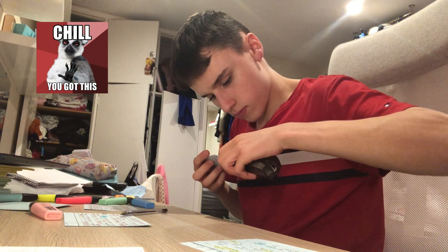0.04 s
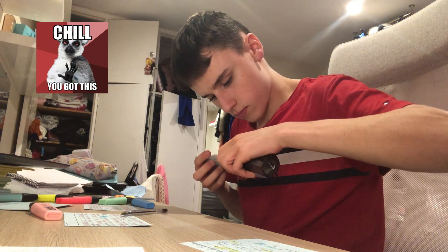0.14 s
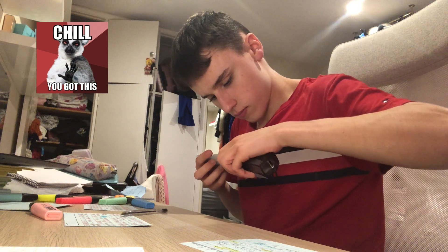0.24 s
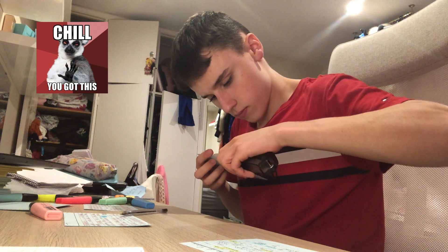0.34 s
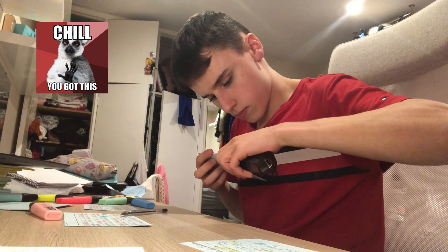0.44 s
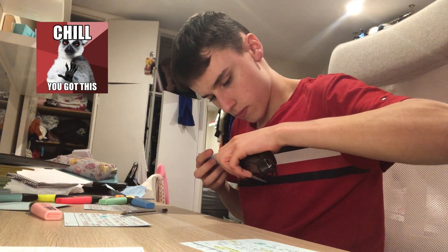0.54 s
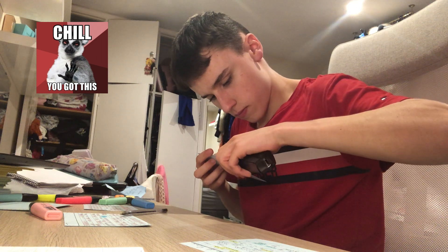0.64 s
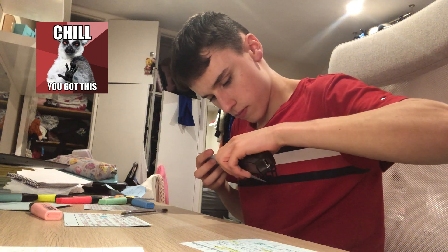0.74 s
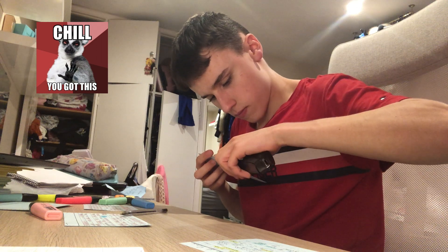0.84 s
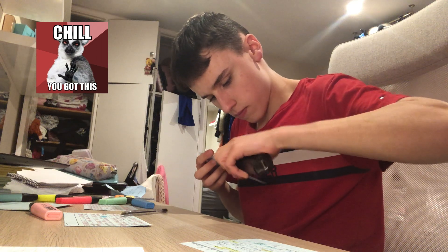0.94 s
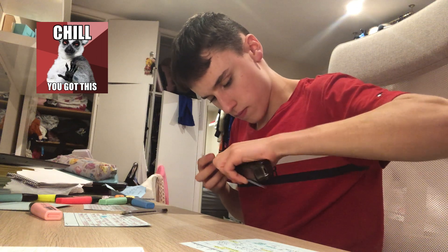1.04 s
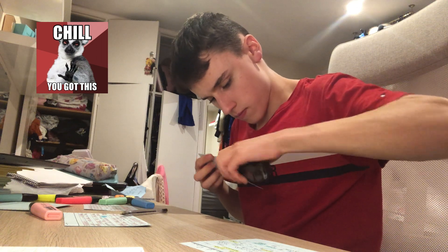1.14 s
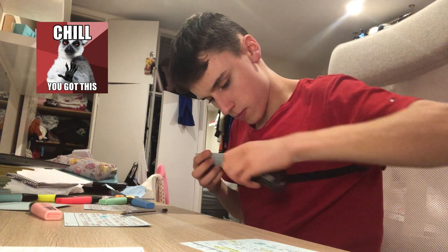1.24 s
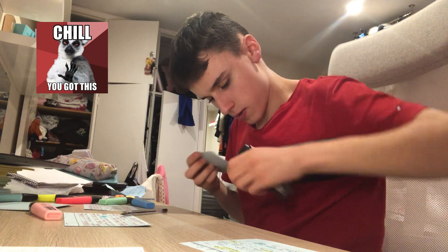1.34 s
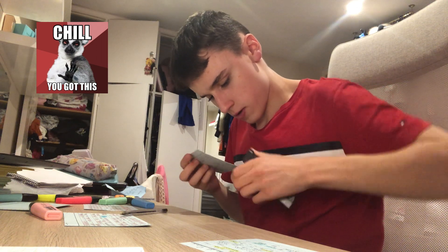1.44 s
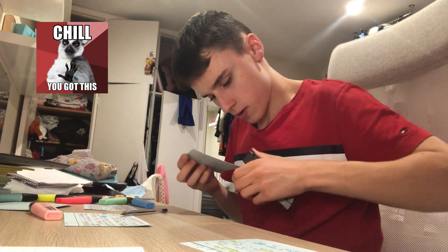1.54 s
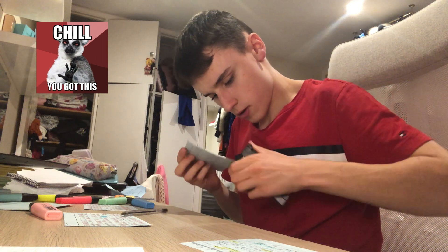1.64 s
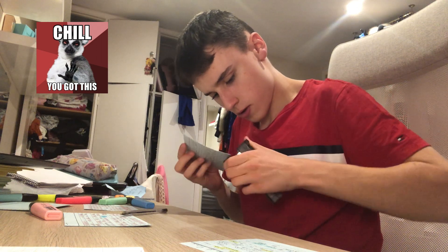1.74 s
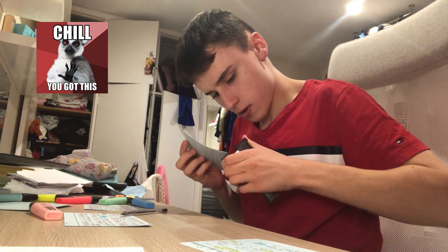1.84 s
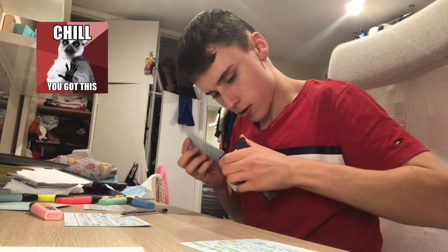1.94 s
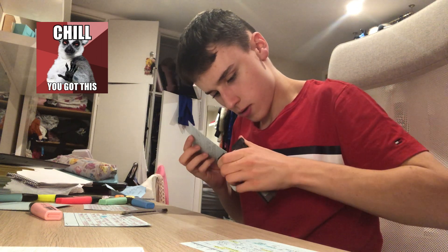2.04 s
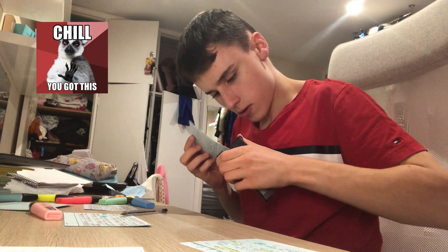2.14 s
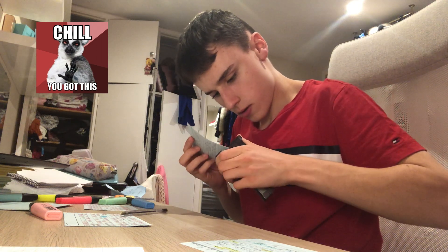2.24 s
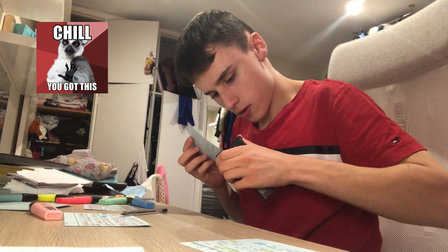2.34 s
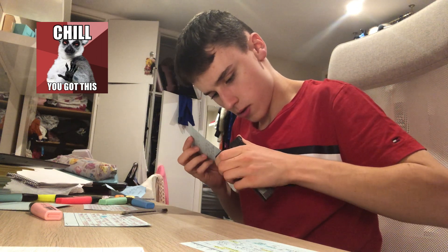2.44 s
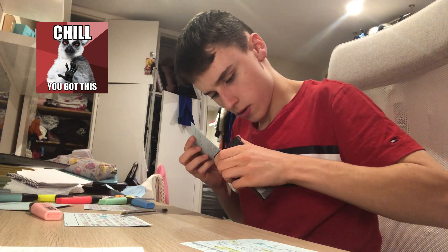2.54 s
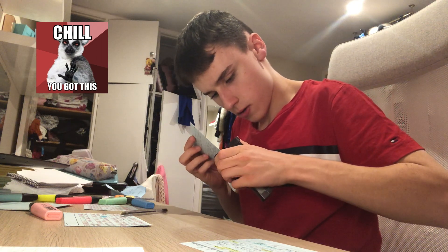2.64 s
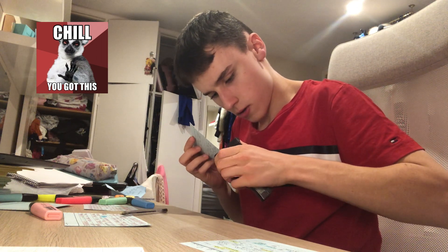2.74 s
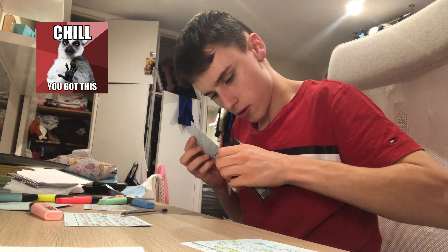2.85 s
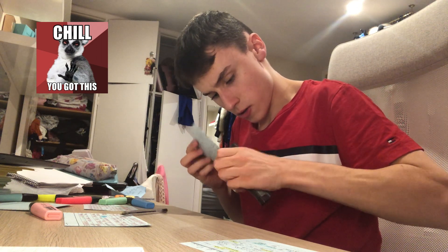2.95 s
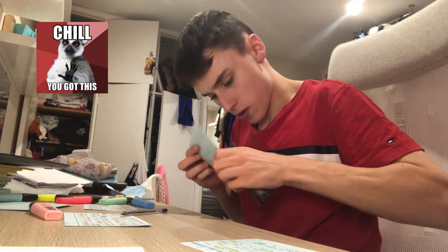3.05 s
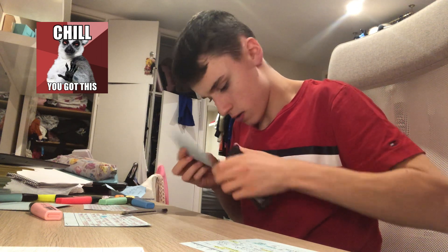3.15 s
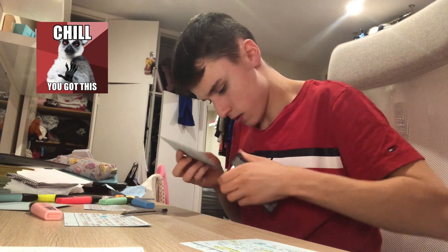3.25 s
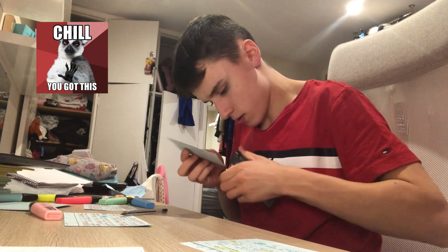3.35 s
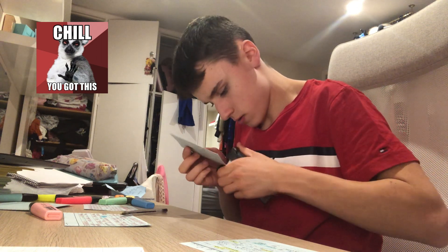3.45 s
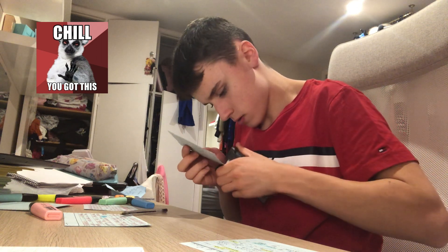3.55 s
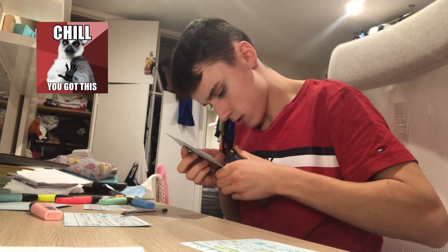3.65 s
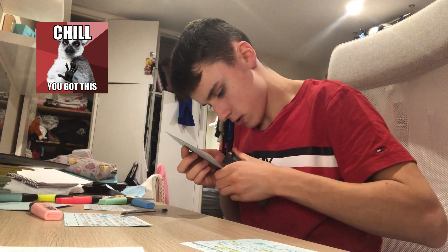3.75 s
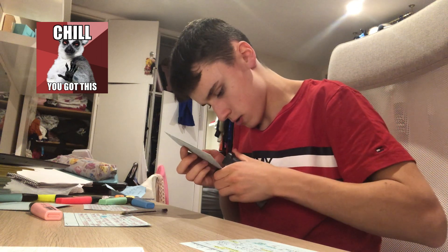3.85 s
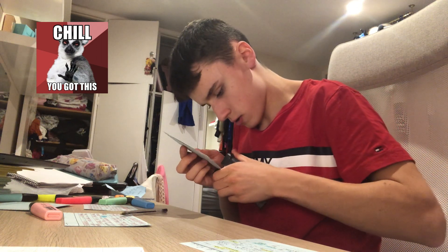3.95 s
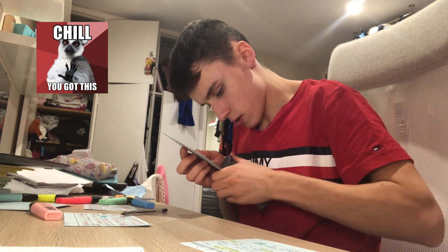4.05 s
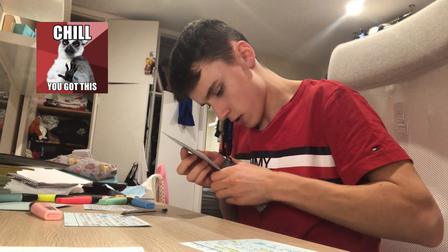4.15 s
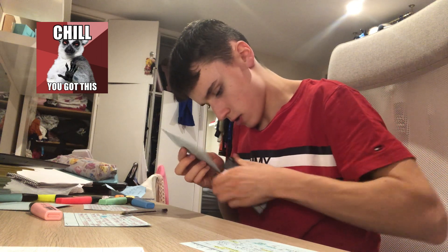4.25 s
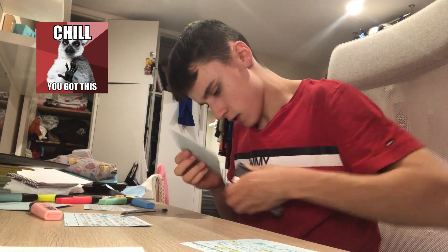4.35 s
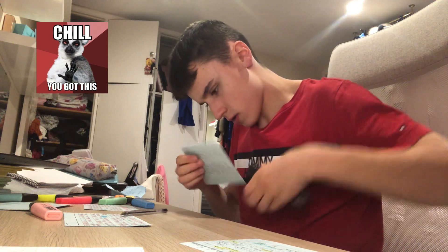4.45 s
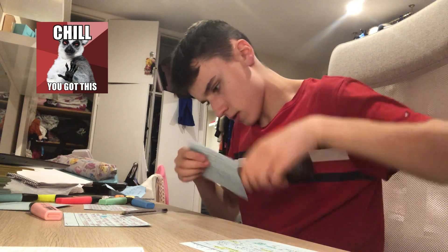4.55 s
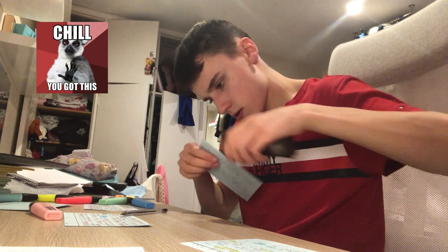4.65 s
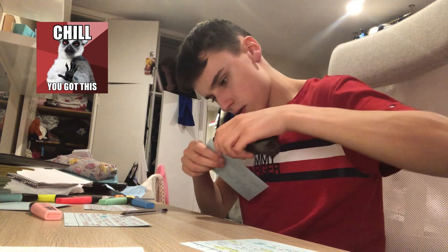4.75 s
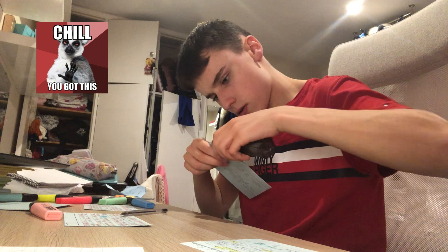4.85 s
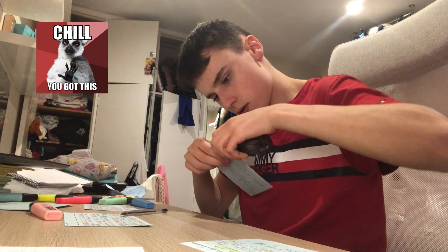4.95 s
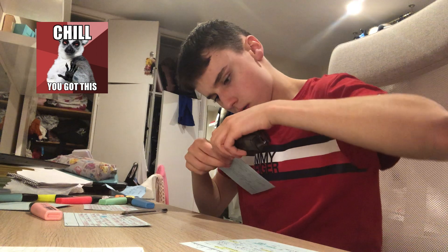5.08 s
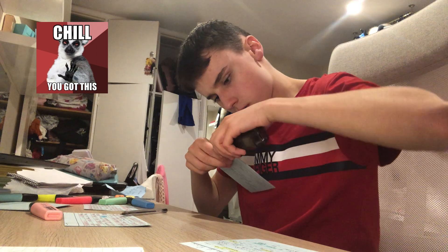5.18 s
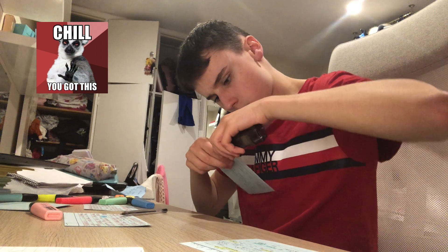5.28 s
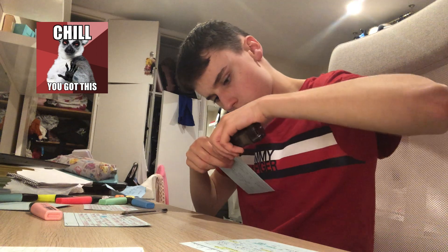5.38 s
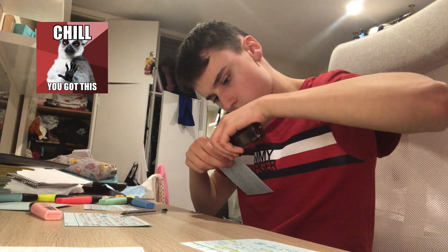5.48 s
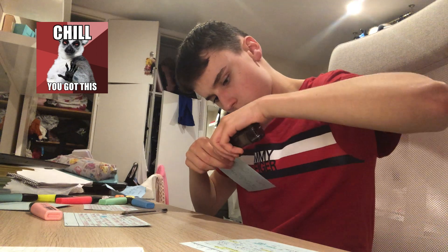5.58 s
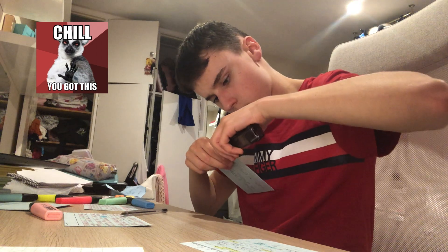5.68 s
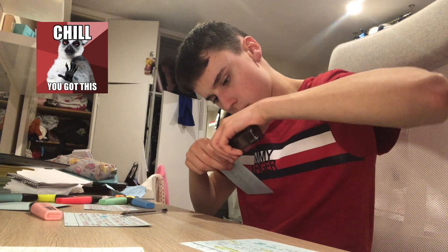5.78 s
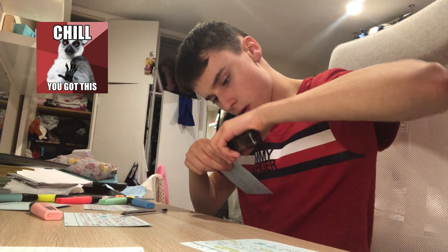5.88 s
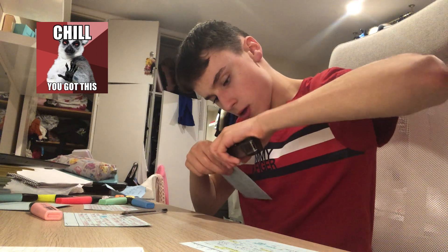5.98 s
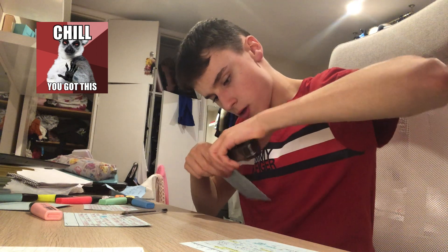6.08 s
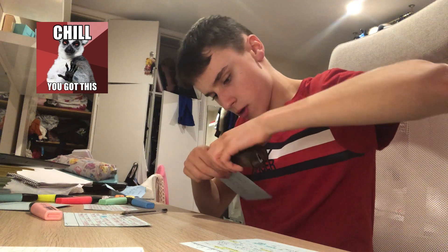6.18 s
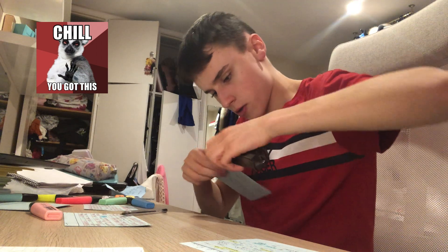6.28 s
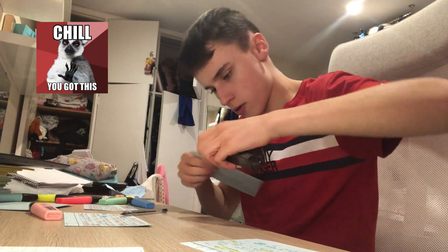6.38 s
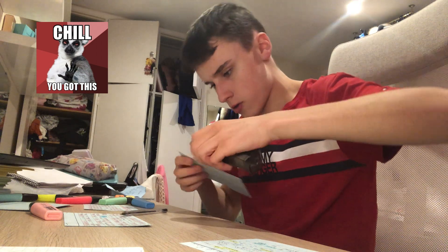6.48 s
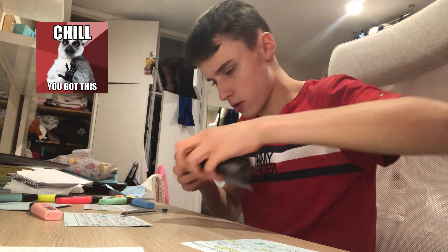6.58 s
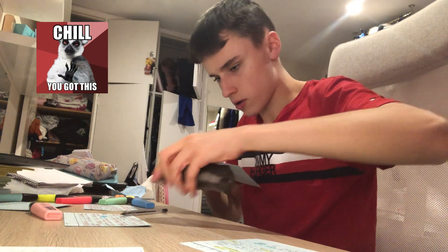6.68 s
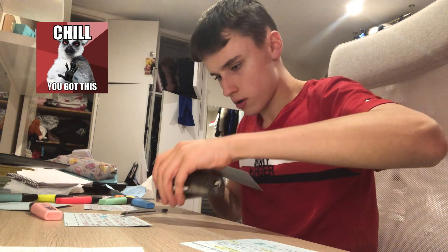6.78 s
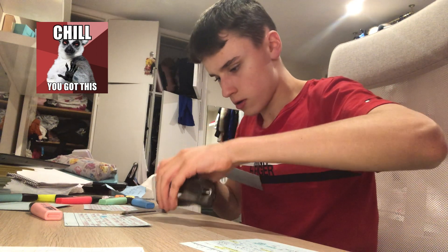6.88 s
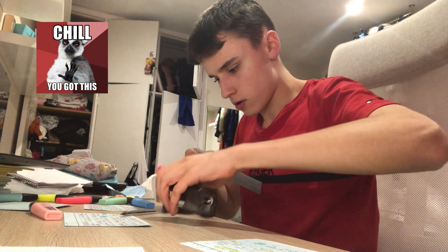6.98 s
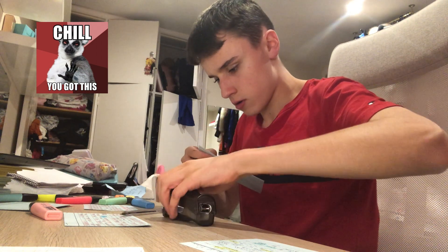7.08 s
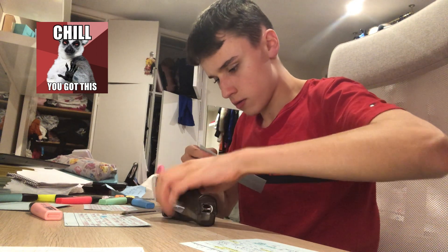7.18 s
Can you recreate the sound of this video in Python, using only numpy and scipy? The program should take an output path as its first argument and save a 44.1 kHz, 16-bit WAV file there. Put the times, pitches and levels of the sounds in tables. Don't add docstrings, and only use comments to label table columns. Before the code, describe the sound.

A quiet small room with soft hiss and faint low rumble, heard by a microphone close above a wooden desk. Small metallic handling taps come at 0.3 to 0.5 seconds. At about 0.9 a stapler takes up with a light click, then crunches in a bright, hard double clack near 1.0 and snaps open at 1.2, with papery scuffs around it. Soft finger rubs and tiny ticks fill the pause. A second squeeze clacks at 2.9 and releases at 3.1 amid card rustle; a third, a little softer, at 4.05 releases at 4.25, with an extra weaker snap at 4.5. Quieter rubbing follows until a fourth clack at 5.9, opening at 6.1 with a faint singing spring. Card brushes gently from 6.0 to 6.9. At 7.08 to 7.1 the stapler slams onto the desk in a rapid cluster of loud, woody, clipped knocks, with a short resonant decay.

```python
import sys
import numpy as np
from scipy import signal
from scipy.fft import rfft, irfft
from scipy.io import wavfile
from scipy.ndimage import uniform_filter1d

SR = 44100
rng = np.random.default_rng(int(sys.argv[2]) if len(sys.argv) > 2 else 0)


def materialize(psi):
    bounded = np.clip(np.atleast_2d(psi).T, -1, 1)
    quanta = np.round(bounded * 32767).astype(np.int16)
    wavfile.write(sys.argv[1], SR, quanta)


def magnitude_from_level(level_db):
    exponent = np.asarray(level_db, float) / 20
    return 10 ** exponent


N = 318402

# (frequency [Hz], density [dB])
HISS_SPECTRUM = [(41, -35), (70, -1.5), (171, 1.5), (688, -6.5), (1400, -14.5), (7760, -22), (9320, -26.5),
                 (15500, -25)]
HISS_DB = -61.5
# (start [s], length [s], level [dB])
RUMBLES = [(.1, 0.31, -57.5), (0.616, 0.19, -59.5), (1.85, 0.32, -65), (2.349, .3, -67), (3.1, 0.23, -69),
           (3.701, .4, -63.5), (4.45, .4, -68), (5.8, .55, -67), (6.502, .4, -68.5)]
DRONES = [(1.0, 0.22, -60.5), (2.4, .85, -64), (3.9, .55, -61), (5.05, .45, -63.5), (5.95, .2, -65),
          (6.55, .65, -62)]
RUMBLE_REST_DB, DRONE_REST_DB, SWELL_S = -72, -78, 0.06

# (start [s], length [s], rub [dB],
# edge squeak [dB])
STROKES = [(0, 0.44, -74, -88), (1.017, 0.12, -52.5, -53), (1.138, 0.097, -51, -49.5),
           (1.241, 0.12, -64, -70), (1.62, .1, -73, -80), (1.857, 0.096, -68, -76), (2.299, .35, -73, -80),
           (2.944, .1, -52.5, -67), (3.063, 0.069, -47, -57), (3.173, 0.19, -67, -65),
           (3.386, 0.12, -61, -64.5), (3.602, .12, -68, -74), (3.86, 0.15, -71.5, -69),
           (4.092, 0.23, -55.5, -61), (4.35, 0.23, -62, -67), (4.558, .12, -62.5, -66),
           (4.74, .14, -77, -71), (4.998, .3, -69, -75), (5.429, 0.064, -69, -80), (5.97, 0.28, -61, -62),
           (6.35, 0.19, -64.5, -65), (6.542, 0.12, -60.5, -65), (6.698, 0.17, -63, -70.5),
           (6.968, 0.061, -64, -70.5)]
GRIP_RUB_DB, GRIP_SQUEAK_DB, STROKE_ATTACK_S, STROKE_RELEASE_S = -78, -81, 0.017, 0.04
# (frequency [Hz], density [dB])
CARD_SPECTRUM = [(400, -16), (800, -4), (1500, -1), (2500, -6), (4700, -2), (7000, -10), (11000, -16),
                 (15500, -18.5)]

# (frequency [Hz], level [dB], t60 [s])
SHELL = [(570, -9, 0.022), (740, 8, 0.022), (863, 3.5, 0.035)]
LEVER = [(1056, 0.85, 0.01), (1290, 1.1, .014), (1530, 3, 0.028)]
ARM = [(1960, -10, 0.01), (2213, 4.5, 0.027), (2540, -2.5, 0.011)]
CRACK = [(6600, -3.5, 0.0013), (7670, -1.2, 0.0043), (7930, 1.1, 0.021), (8970, -1.6, 0.0053),
         (10820, 1, 0.0035), (11600, -2, 0.0014), (15500, -5.3, 0.00067)]
MAGAZINE = [(2890, 5.5, 0.0073), (3274, 5.5, 0.017), (3610, 7, 0.015), (4030, -0.5, .008), (4580, -3, .008),
            (4830, -8, 0.0063)]
# (low edge [Hz], high edge [Hz], build-up [ms], broad grit [dB])
PART_RESPONSES = [
    (446, 1000, 3, -8),
    (970, 1790, 2.3, -5.5),
    (1700, 2100, 2.4, -12.5),
    (5100, 13700, 1.2, 2.5),
    (2400, 5600, 1.9, -4),
]

# (time [s], peak [dB], shell [dB], lever [dB], arm [dB])
TAKE_UP = [(.9134, -26, -10, -4, -8), (2.8455, -30, -25.5, -3, -12), (4.009, -25.5, -14, -17, -4),
           (5.7096, -41.5, -24, -16, 1)]
DRIVE = [(.9727, -7, -20, 4, -1), (2.8994, -8, -12, 0, -15), (4.0514, -16, -6, 4, 0),
         (5.903, -9, -11.5, 3, 0.5)]
CLINCH = [(1.0066, -7, -7.5, -1.5, -18), (2.9416, -7.5, -12, -6.5, -11.5), (4.096, -13, -8, -10, -13.5),
          (5.9565, -9, -6.5, -3, -4)]
LET_GO = [(1.157, -27, -18, -11, -9.5), (3.0758, -22.5, -22, -9, -14), (4.2276, -26, -28, -5.5, -15),
          (6.1014, -26, -16.5, -3.5, -8)]
SNAP_OPEN = [(1.1827, -7, -21.5, -25, -8.5), (3.101, -12.5, -15.5, -11.5, -14),
             (4.2554, -11, -14.5, -11, -7.5), (6.123, -13, -10, -11, 1), (4.5034, -22.5, -3.5, -9.5, -13)]
STAGE_CRACK_DB = [
    -8.5,
    -8.5,
    -6.5,
    -5,
    -3,
]
FACING_DB = [-2, -3, 2.5, 6, -9]

# (time [s], peak [dB], struck part above the magazine [dB])
SHELL_TAPS = [(.32, -39.5, -5.5), (.5126, -36.5, -0.5), (1.1313, -31.5, 5), (1.2348, -35, -2),
              (1.457, -50.5, 1.5), (2.0038, -48.5, 13), (2.142, -53.5, 13.5), (2.3334, -50, 0),
              (2.3741, -48.5, 8), (2.382, -33, 6.5), (3.1436, -36, -2), (3.4068, -56.5, 12.5),
              (3.4492, -49, 5), (3.4694, -53, 7.5), (4.0271, -33, 4.5), (4.2802, -29, 5), (4.3026, -33, 7),
              (4.518, -44, 10), (4.4189, -49.5, 6), (6.2292, -36.5, 2.5), (7.0914, -23, 18),
              (7.1027, -23, -1)]
LEVER_CLICKS = [(1.2219, -32.5, 3.5), (1.6247, -54.5, 1.5), (2.348, -53.5, 7.5), (2.855, -36, 3),
                (3.5319, -52.5, 8.5), (3.8432, -41.5, 3.5), (4.2043, -29.5, -3.5), (5.745, -49.5, 14),
                (6.0925, -39, -2), (6.2441, -41.5, 8)]
ARM_TICKS = [(0.3772, -47.5, -14), (0.9032, -42.5, -22), (3.1339, -28.5, -12), (4.0053, -43.5, 3.5),
             (5.319, -58.5, 8.5), (5.7292, -47, -7), (6.2127, -35, -9), (6.7999, -49.5, 5.5)]
STAPLE_TICKS = [(0.292, -45.5, -3), (1.3262, -32, -10.5), (1.3996, -58.5, 7), (2.815, -52, -1),
                (3.7662, -48, -2.5), (5.672, -55.5, 2.5)]
# (shell [dB], lever [dB], arm [dB], crack [dB])
SPREAD_DB = [
    (0.5, -5, -11, -14),
    (-8, 0.5, -10, -14.5),
    (-10, -8, 0, -13),
    (-13.5, -12.5, -10, 0.5),
]
FOLLOWS = 0.66

# (frequency [Hz], level [dB], t60 [s])
JOLT_MODES = [(124.8, -23, 0.1), (195, -29, .12), (240, -35, 0.04), (279.2, -10.5, 0.15), (420, -8.5, .08)]
# (start [s], damped at [s], frequency [Hz], level [dB], t60 [s])
SPRING = [(1.01, 1.13, 3990, -50, 0.33), (2.943, 3.084, 2110, -50, 1), (3.105, 3.235, 1780, -44.5, 0.32),
          (3.138, 3.24, 2080, -55.5, .4), (4.262, 4.493, 1720, -56, 0.9), (4.503, 4.68, 1855, -52, 0.35),
          (5.957, 6.107, 2120, -45, 0.98), (5.958, 6.06, 1432, -57.5, 0.12), (6.118, 6.21, 4960, -54, 0.4),
          (4.26, 4.49, 3280, -57, .7), (3.19, 3.5, 3530, -66, 3.0)]
# (time [s], blow [dB], contact time [ms], sweep [dB])
SET_DOWN = [
    (7.053, -48, 0.39, -28),
    (7.066, -36, 0.55, -35),
    (7.0766, -9, 0.36, 12),
    (7.0917, 5.5, 1.1, 7.5),
    (7.0984, -1, 1.2, 1),
    (7.104, -17, 1.43, 0),
]
# (frequency [Hz], level [dB], t60 [s])
DESK_MODES = [(127, -19, 0.214), (199.5, -23, 0.2), (279.2, 2, 0.19), (334.8, -16, 0.28), (411, -6, 0.16),
              (480, -8, 0.24), (527, 0, 0.06), (668, -8.5, 0.11), (800, -10.5, 0.15), (1117, -21.5, 0.15),
              (1470, -22, 0.12), (1630, -34, 0.12), (1860, -34, 0.18), (2020, -25, 0.18)]

# (frequency [Hz], t60 [s], level [dB])
ROOM = [(150, .3, -8.5), (465, 0.14, -4), (1450, .2, -17.5), (4000, 0.16, -12), (10000, 0.08, -11.5)]
# (delay [ms], level [dB])
ECHOES = [
    (3.0, -13.5),
    (9.5, -17.5),
    (21.0, -25),
]


def rms_one(x):
    return x / np.sqrt(np.mean(x ** 2) + 1e-20)


def loudest_one(x):
    return x / np.sqrt(uniform_filter1d(x ** 2, size=256).max())


def band(x, low_hz, high_hz):
    return signal.sosfilt(signal.butter(2, [low_hz, high_hz], "band", fs=SR, output="sos"), x)


def at_hz(points, hz, axis=1):
    points = np.array(points)
    return np.interp(np.log(hz), np.log(points[:, 0]), points[:, axis])


def coloured(x, spectrum):
    hz = np.arange(len(x) // 2 + 1) * SR / len(x) + 1
    return rms_one(irfft(rfft(x) * magnitude_from_level(at_hz(spectrum, hz)), len(x)))


def drift(rate_hz):
    r = np.exp(-2 * np.pi * rate_hz * 40 / SR)
    white = rng.standard_normal(N // 40 + 2002)
    slow = signal.lfilter([1], [1, -2 * r, r * r], white)[2000:]
    return np.interp(np.arange(N) / 40, np.arange(len(slow)), rms_one(slow))


def ring(clicks, hz, t60):
    r, w = magnitude_from_level(-60 / (t60 * SR)), 2 * np.pi * hz / SR
    return signal.lfilter([0, np.sin(w)], [1, -2 * r * np.cos(w), r * r], clicks + 1e-18)


def add(out, s, sound):
    at = round(s * SR)
    out[at:at + len(sound)] += sound[:N - at]


def swells(starts, lengths, levels_db, rest_db, attack_s, release_s):
    t = np.arange(0, N / SR + 0.01, 0.002)
    power = magnitude_from_level(2 * rest_db)
    for s, length, level_db in zip(starts, lengths, levels_db):
        rise = np.clip((t - s) / attack_s, 0, 1) ** 2
        fall = np.exp(-2 * np.maximum(t - s - length, 0) / release_s)
        power = power + magnitude_from_level(2 * level_db) * rise * fall
    return np.interp(np.arange(N) / SR, t, np.sqrt(power))


def floor():
    rumbling = swells(*np.transpose(RUMBLES), RUMBLE_REST_DB, SWELL_S, SWELL_S)
    droning = swells(*np.transpose(DRONES), DRONE_REST_DB, SWELL_S, SWELL_S)
    hiss, rumble, drone = rng.standard_normal((3, N))
    return (magnitude_from_level(HISS_DB - 0.5) * coloured(hiss, HISS_SPECTRUM)
            + rumbling * magnitude_from_level(3) * rms_one(band(band(rumble, 32, 52), 32, 62))
            + droning * rms_one(ring(drone, 510, t60=0.046)))


def card(grain_db=2.2, grains_per_s=4000, squeak_hz=3520, upper_hz=4100):
    s, length, rub_db, squeak_db = np.transpose(STROKES)
    rub = swells(s, length, rub_db, GRIP_RUB_DB, STROKE_ATTACK_S, STROKE_RELEASE_S)
    edge = swells(s, length, squeak_db, GRIP_SQUEAK_DB, STROKE_ATTACK_S, STROKE_RELEASE_S)
    heights = magnitude_from_level(grain_db * np.minimum(rng.exponential(1, N), 4.0))
    grains = (rng.random(N) < grains_per_s / SR) * heights * rng.choice([-1, 1], N)
    squeak = rms_one(ring(grains, squeak_hz, t60=0.015) + magnitude_from_level(-5) * ring(grains, upper_hz, t60=0.0074))
    rubbing = rub * magnitude_from_level(2.3 * drift(41)) * coloured(grains, CARD_SPECTRUM)
    return rubbing + edge * magnitude_from_level(3.0 * drift(15) - 4.5) * squeak


def contacts():
    rows = []
    stages = (TAKE_UP, DRIVE, CLINCH, LET_GO, SNAP_OPEN)
    for table, crack_db in zip(stages, STAGE_CRACK_DB):
        for row, facing_db in zip(table, FACING_DB):
            rows.append((*row, crack_db + facing_db))
    for struck, table in enumerate((SHELL_TAPS, LEVER_CLICKS, ARM_TICKS, STAPLE_TICKS)):
        share = np.where(np.arange(len(SPREAD_DB)) == struck, 1, FOLLOWS)
        for s, peak_db, above_db in table:
            rows.append((s, peak_db, *(SPREAD_DB[struck] + share * above_db)))
    return rows


def stapler(rattle_ms=24.0, rattle_db=-18, radiates_hz=450, soften=0.55, slam=5.5):
    front, around = np.zeros(N), np.zeros(N)
    ms = np.arange(3072) / SR * 1000
    for s, peak_db, *parts_db in contacts():
        grit = rng.standard_normal(len(ms))
        slow = 1 - soften * peak_db / 40
        rattle = magnitude_from_level(rattle_db) * np.exp(-ms / rattle_ms) * grit
        parts = zip((SHELL, LEVER, ARM, CRACK, MAGAZINE), parts_db + [0], PART_RESPONSES)
        for modes, part_db, (low_hz, high_hz, rise_ms, grit_db) in parts:
            late = ms / (rise_ms * slow)
            blow = late * np.exp(-late ** 2 / 2) * grit * np.sqrt(np.abs(grit))
            blow[np.searchsorted(late, 1)] += slam
            broad = loudest_one(band(blow + rattle, low_hz, high_hz))
            rung = 0
            for hz, mode_db, t60 in modes:
                level_luck, pitch_luck = rng.standard_normal(2)
                rung = rung + magnitude_from_level(mode_db + 2 * level_luck) * ring(blow, hz * (1 + pitch_luck / 70), t60)
            gain = magnitude_from_level(peak_db + part_db - 8.5)
            add(front, s - 0.0012, gain * loudest_one(loudest_one(rung) + magnitude_from_level(grit_db) * broad))
            add(around, s - 0.0012, gain * broad)
    no_bass = signal.butter(3, radiates_hz, "high", fs=SR, output="sos")
    return signal.sosfilt(no_bass, [front, around])


def jolt(soft_hz=250):
    s, peak_db, shell_db = np.transpose(contacts())[:3]
    held = s < SET_DOWN[0][0]
    blows = np.zeros(N)
    blows[np.round(s * SR).astype(int)] = magnitude_from_level(peak_db + 0.93 * shell_db) * held
    push = band(blows, 110, soft_hz)
    return sum(magnitude_from_level(db) * ring(push, hz, t60) for hz, db, t60 in JOLT_MODES)


def spring():
    out = np.zeros(N)
    for start, stop, hz, level_db, t60 in SPRING:
        t = np.arange(round((stop - start) * SR)) / SR
        damped = np.minimum(1, (t[-1] - t) / 0.0046)
        add(out, start, magnitude_from_level(level_db - 60 * t / t60) * np.sin(2 * np.pi * hz * t) * damped)
    return out * magnitude_from_level(2.5 * drift(35))


def desk(low_hz=450, fall_ms=0.5, sweep_ms=3.5, tilt=0.94, sharp=2.4):
    out = np.zeros(N)
    ms = np.arange(round(0.17 * SR)) / SR * 1000
    for s, blow_db, contact_ms, sweep_db in SET_DOWN:
        pitch = low_hz + sharp * 1000 / contact_ms / (1 + ms / fall_ms) ** 2
        swell = (low_hz / pitch) ** tilt * np.exp(-(ms / sweep_ms) ** 2)
        sweep = np.sin(2 * np.pi * np.cumsum(pitch) / SR) * swell
        push = ms / contact_ms * np.exp(-ms / contact_ms)
        push = push / push.sum()
        modes = 0
        for hz, db, t60 in DESK_MODES:
            modes = modes + magnitude_from_level(db + 1.2 * rng.standard_normal()) * ring(push, hz, t60)
        add(out, s, magnitude_from_level(blow_db) * modes + magnitude_from_level(sweep_db) * sweep)
    t = np.arange(round(0.012 * SR)) / SR
    skid = magnitude_from_level(-17 + 1800 * (t - t[-1])) * np.sin(2 * np.pi * 1000 * t)
    add(out, SET_DOWN[2][0] - t[-1], skid)
    return band(out, 77, 15000)


def room(x, first_ms=1.5):
    t, tail = np.arange(SR // 2) / SR, 0
    after_first = np.clip(t * 1000 / first_ms - 1, 0, 1)
    for hz in 70 * 2.0 ** np.arange(8):
        octave = band(rng.standard_normal(len(t)), hz, min(2 * hz, 0.4 * SR))
        dying = magnitude_from_level(-60 * t / at_hz(ROOM, 1.4 * hz)) * after_first
        level = magnitude_from_level(at_hz(ROOM, 1.7 * hz, axis=2))
        tail = tail + octave * dying / np.sqrt(np.sum(dying ** 2)) * level
    for ms, echo_db in ECHOES:
        tail[round(ms * SR / 1000)] += magnitude_from_level(echo_db)
    return signal.fftconvolve(x, tail)[:N]


def scene():
    quiet = floor() + card()
    front, around = stapler()
    rest = jolt() + spring() + desk()
    return (quiet + front + rest + room(around + magnitude_from_level(-3.5) * rest))[None]


def band_limit(x):
    return signal.sosfilt(signal.butter(12, 16890, fs=SR, output="sos"), x)


def record(dry):
    top = signal.cheby2(14, 35, 16400, fs=SR, output="sos")
    bass = signal.butter(4, 45, "high", fs=SR, output="sos")
    heard = signal.sosfilt(bass, signal.sosfilt(top, dry))
    return band_limit(np.clip(heard, -0.99, 0.99))


dry = scene()
out = record(dry)
materialize(out)
```